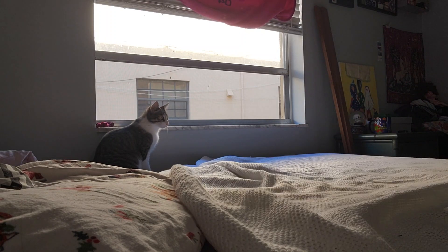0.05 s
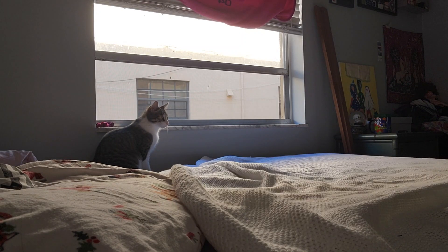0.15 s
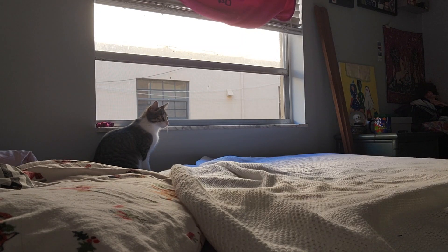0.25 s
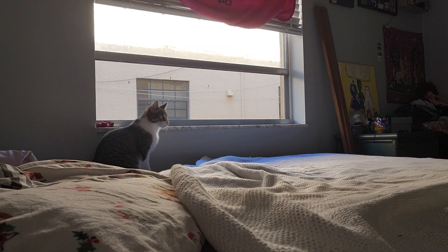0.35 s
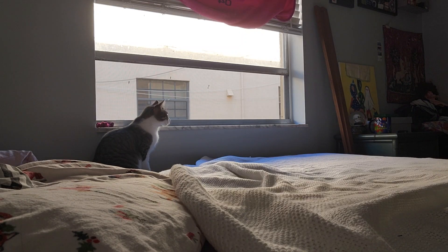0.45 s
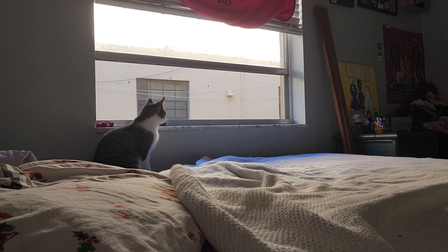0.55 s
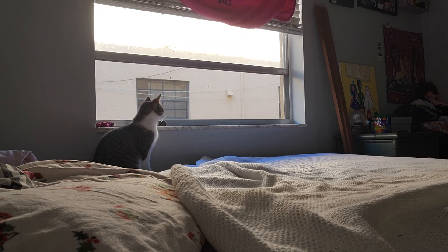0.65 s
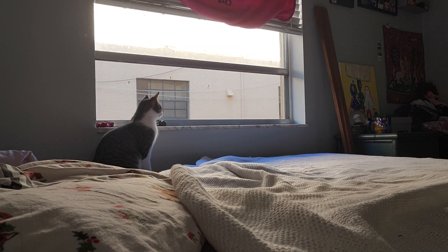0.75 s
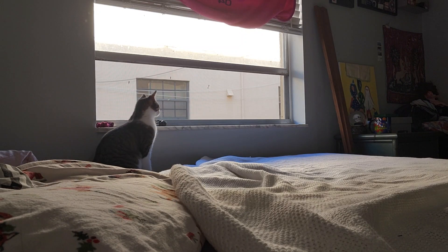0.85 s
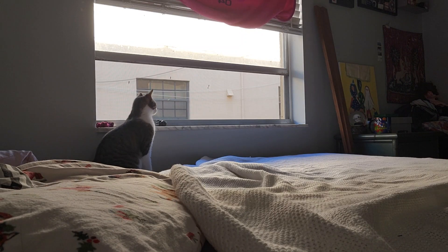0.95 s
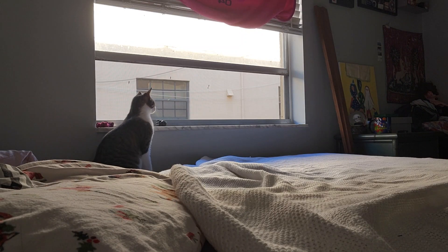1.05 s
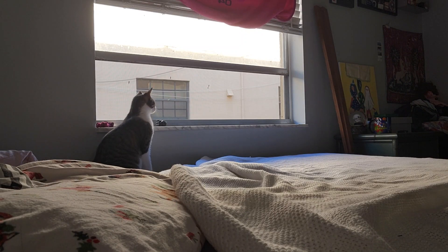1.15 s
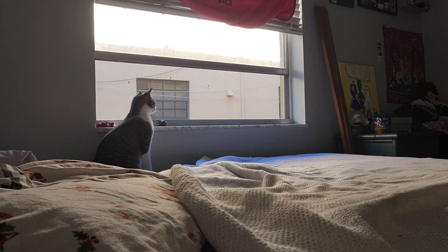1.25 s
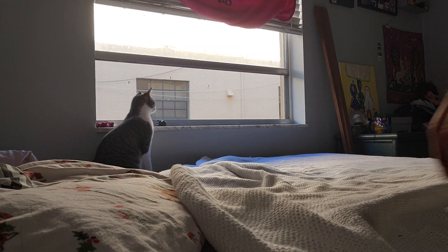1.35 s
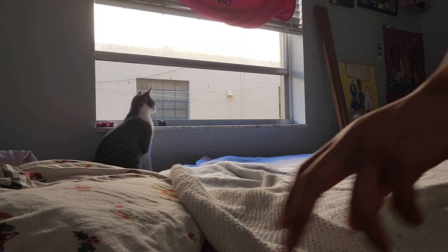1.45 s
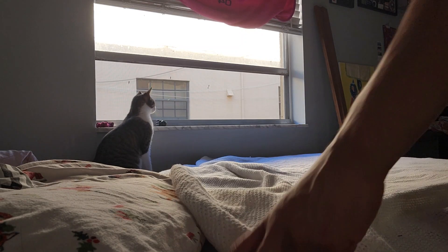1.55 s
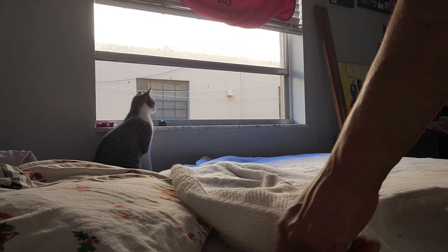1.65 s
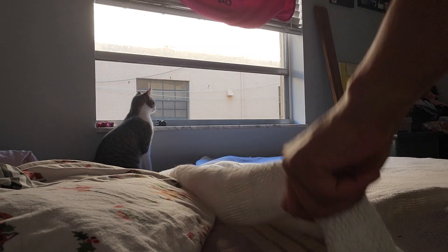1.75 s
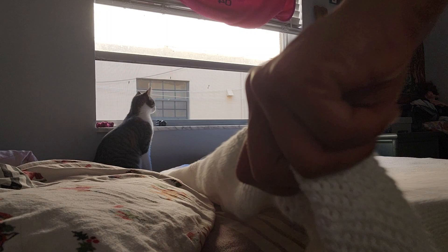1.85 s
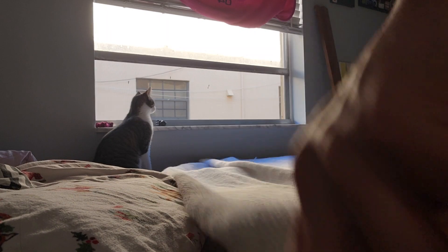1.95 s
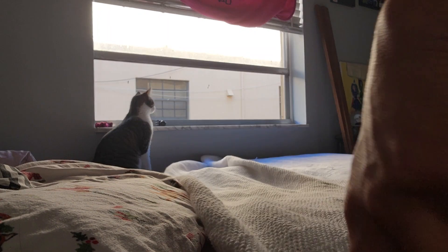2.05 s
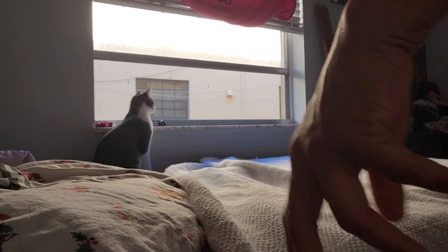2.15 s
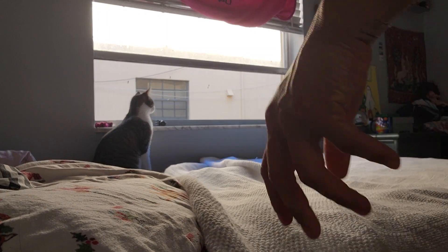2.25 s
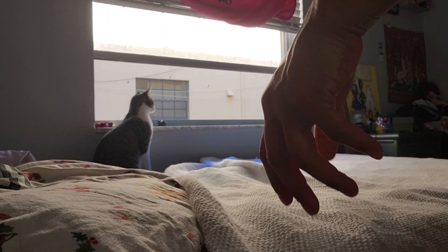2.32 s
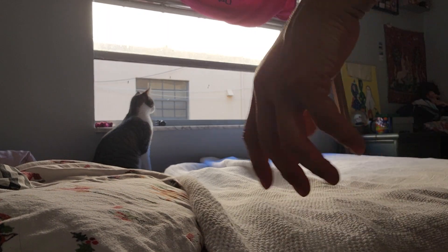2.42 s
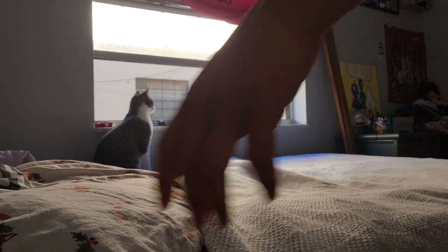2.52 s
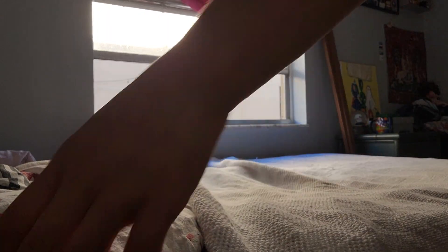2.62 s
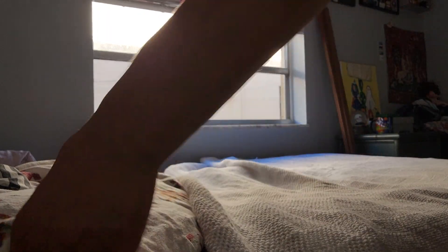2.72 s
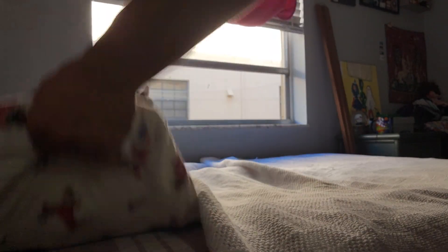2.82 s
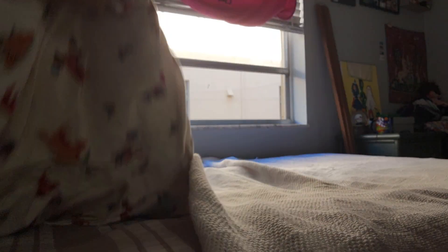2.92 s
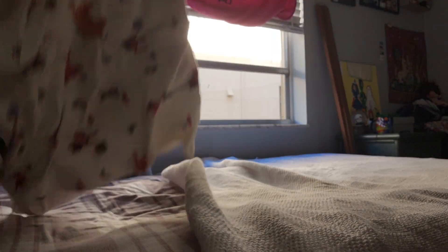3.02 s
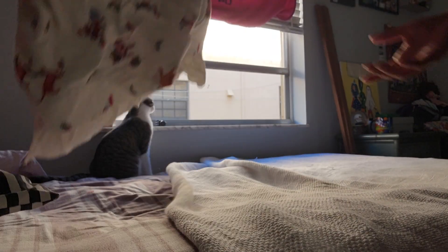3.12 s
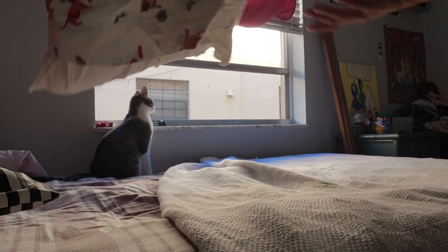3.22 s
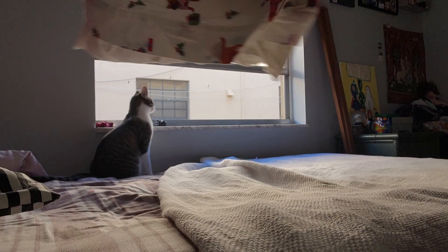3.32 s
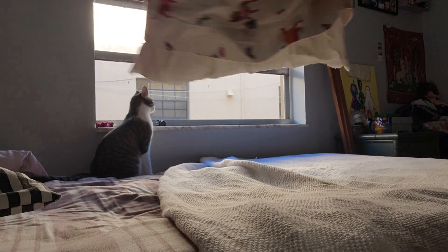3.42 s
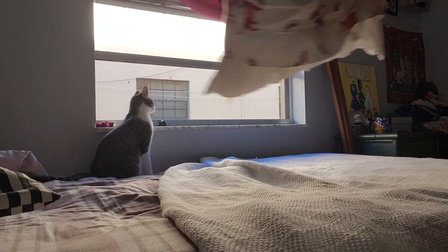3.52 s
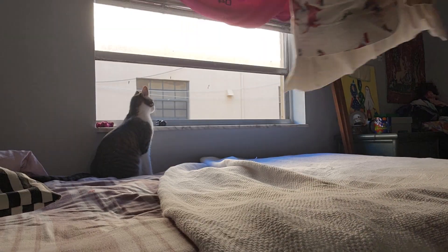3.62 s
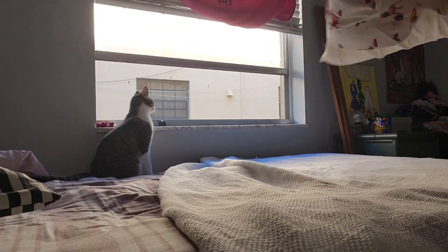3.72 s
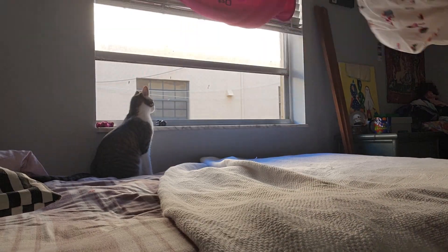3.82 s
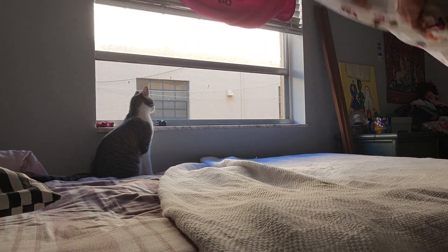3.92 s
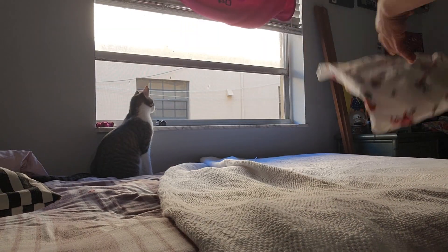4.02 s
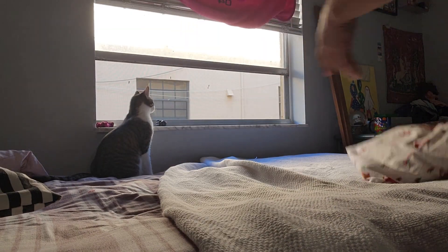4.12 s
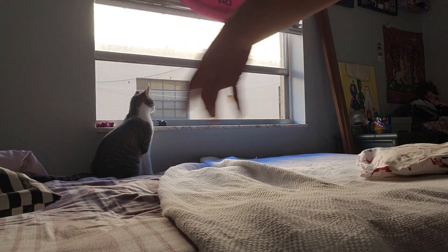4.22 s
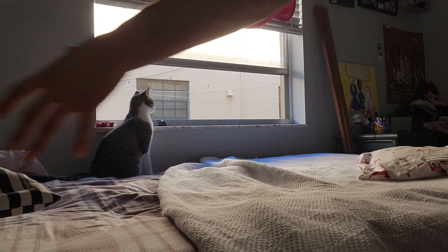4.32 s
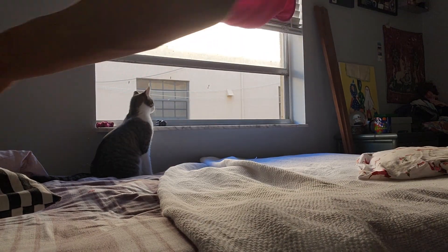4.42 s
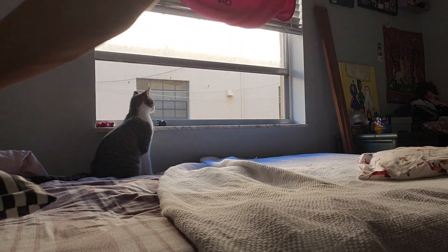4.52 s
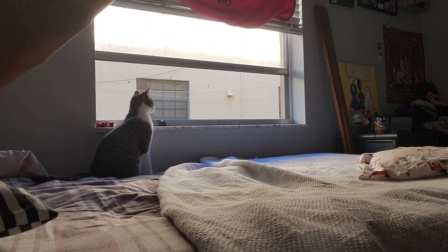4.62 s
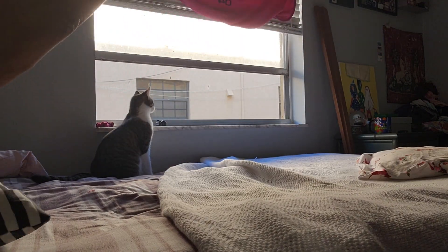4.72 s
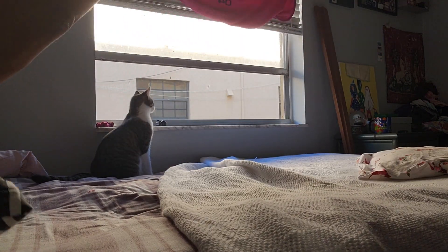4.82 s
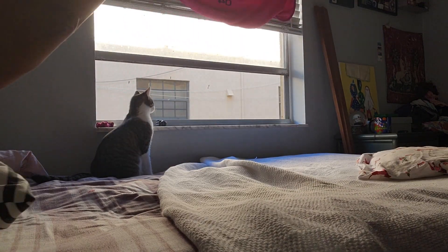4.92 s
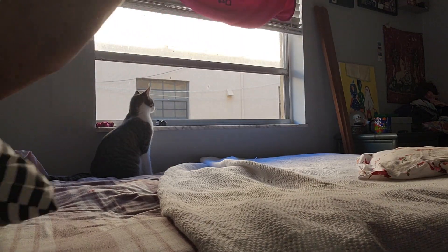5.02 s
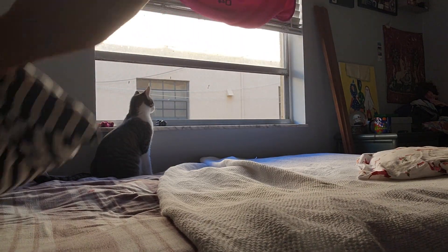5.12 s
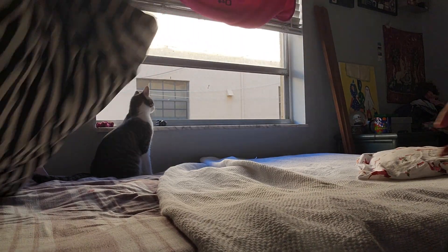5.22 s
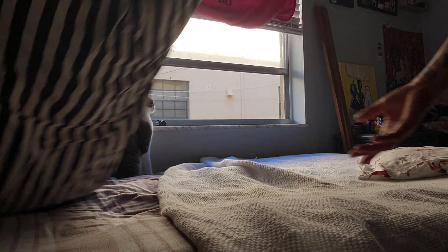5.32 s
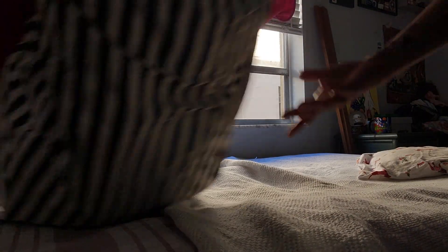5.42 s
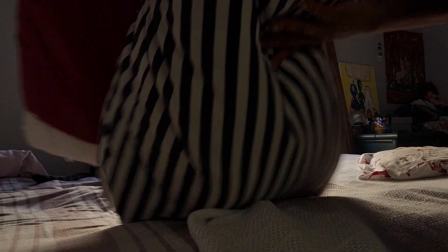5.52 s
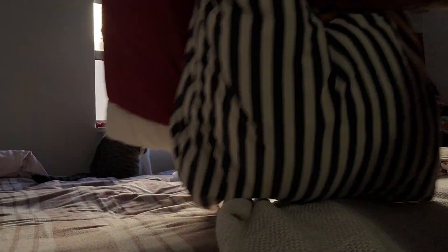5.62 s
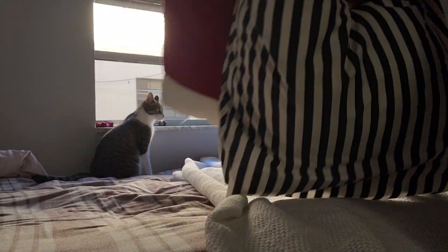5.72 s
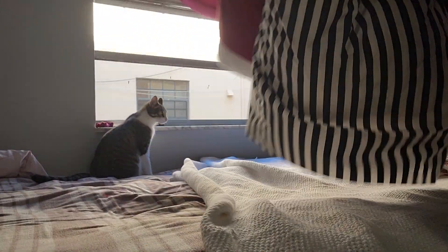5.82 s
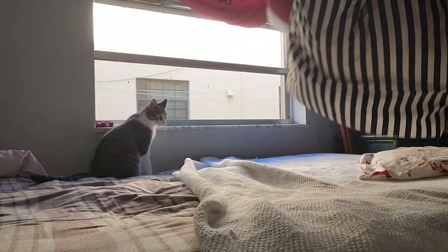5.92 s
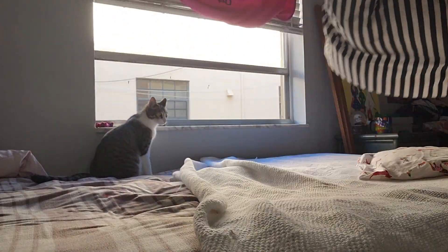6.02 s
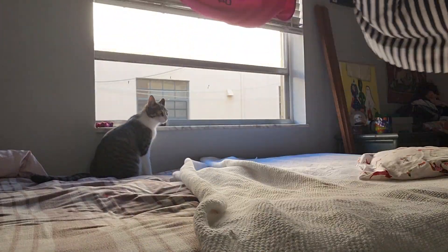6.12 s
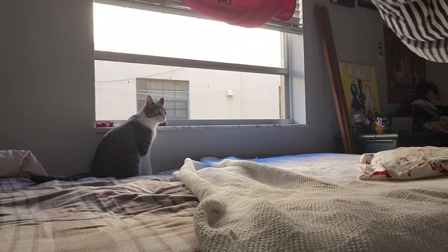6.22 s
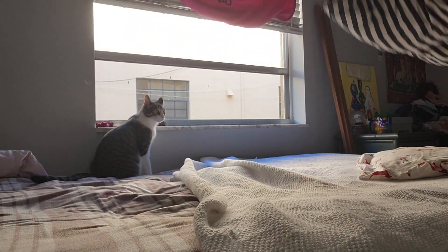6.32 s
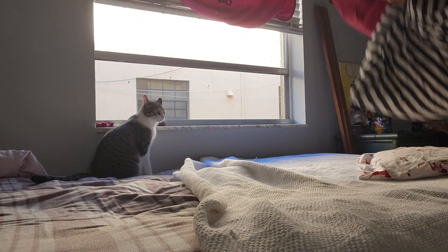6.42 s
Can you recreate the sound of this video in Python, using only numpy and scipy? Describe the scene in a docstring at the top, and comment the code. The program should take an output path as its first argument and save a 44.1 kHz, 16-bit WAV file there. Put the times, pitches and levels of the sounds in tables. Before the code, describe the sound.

Close stereo microphones pick up bedding handled in a quiet, softly furnished bedroom, over faint air and low, wandering house rumble. A small rustle comes at 0.1 s, then a quick crumple and snap at 0.7. Bright, fine swishes of cloth sliding on cloth, leaning right, come at 1.0-1.2 and 1.4-1.6, with a small fold snap at 1.55. A duller crumpling tug follows at 1.8, then light rubbing. From 2.5 to 3.1 muffled thumps cluster, strongest with snaps around 2.77, and folds crumple loudly near 2.95. A softer long slide trails to 3.4, with a light bump and rustle at 3.5. It is quieter until soft pats at 4.4. Swishes and low mattress heaves drift left from 4.8 to 5.5, with a crisp snap at 5.25. The loudest, a short firm thud with a snap, lands at 5.69. Cloth settles faintly until about 6.4.

```python
"""Making a bed, close to the microphones

In a quiet bedroom cloth slides over cloth with a bright swish: grainy noise under stroke envelopes, band by band.
Folds crumple (uneven noise ringing air pockets) and snap taut (short noise puffs). Hands and pillows land on the
mattress as thumps that ring its modes, and it heaves in low noise. The soft room answers thumps and snaps with
a short wash, over a low rumble of house and bed frame and a faint room air, both of them noise."""
import sys
import numpy as np
from scipy import signal
from scipy.fft import rfft, irfft, next_fast_len
from scipy.io import wavfile

SR = 44100
rng = np.random.default_rng(int(sys.argv[2]) if len(sys.argv) > 2 else 0)


def log_audio(samples):
    """Write samples as a 16-bit WAV file to the path given in sys.argv[1]."""
    # one column per channel
    frames = np.atleast_2d(samples).T
    # limit to full scale, then quantise
    limited = np.clip(frames, -1, 1)
    pcm = np.round(limited * 32767).astype(np.int16)
    wavfile.write(sys.argv[1], SR, pcm)


N = 284886


def from_db(db):
    """Decibels to gain."""
    return 10 ** (np.asarray(db) / 20)


def rms_one(x):
    """Scale to rms 1."""
    return x / np.sqrt(np.mean(x ** 2) + 1e-20)


def in_time(rows):
    """Read a table of (time, value) at every sample."""
    s, value = np.transpose(rows)
    return np.interp(np.arange(N) / SR, s, value)


def at_hz(points, hz):
    """Read a table of (frequency, value) on a log-frequency axis."""
    table_hz, value = np.transpose(points)
    return np.interp(np.log(hz), np.log(table_hz), value)


def band(x, low, high):
    """Band-pass between two frequencies in Hz."""
    return signal.sosfilt(signal.butter(2, [low, high], "band", fs=SR, output="sos"), x)


def drift(rate_hz):
    """Slow chance of rms 1: noise at every 8th sample through a double one-pole low-pass."""
    r = np.exp(-2 * np.pi * rate_hz * 8 / SR)
    noise = rng.standard_normal(N // 8 + 4002)
    slow = signal.lfilter([1], [1, -2 * r, r * r], noise)[4000:]   # drop the filter's start
    return np.interp(np.arange(N) / 8, np.arange(len(slow)), rms_one(slow))


def fibres(spectrum, grain_db, grain_hz, lag_ms):
    """Noise clumped into grains and coloured, rms 1; its shared part reaches the left side lag_ms later."""
    # how alike the two microphones hear: f/Hz, shared part of the power
    likeness = [(60, .98), (180, 0.89), (550, 0.67), (1650, 0.12), (5000, 0.17), (15000, 0.1)]
    size = next_fast_len(N)
    grains = rng.standard_normal((3, N)) * from_db(grain_db * drift(grain_hz))
    shared, *own = rfft(grains, size)
    hz = np.linspace(1, SR / 2, len(shared))
    alike = at_hz(likeness, hz)
    late = np.exp(-1j * np.pi * hz * lag_ms / 1000 * np.array([[1], [-1]]))   # half the lag on each side
    pair = np.sqrt(alike) * shared * late + np.sqrt(1 - alike) * np.array(own)
    return rms_one(irfft(pair * from_db(at_hz(spectrum, hz)), size)[:, :N])


def gestures(rows):
    """Rise, hold and fall in dB under full level, and seconds since full level; a row per gesture."""
    swell_db = 20   # gained in the rise time, lost in the fall time
    s, rise, hold, fall = np.array(rows)[:, :4].T[:, :, None] + 1e-4
    since = np.arange(0, N + 32, 32) / SR - s   # every 32nd sample
    rising, falling = -since / rise, (since - hold) / fall
    return -swell_db * np.maximum(np.maximum(rising, falling), 0), since


def summed(power):
    """Power of all gestures together, at every sample."""
    return np.interp(np.arange(N) / 32, np.arange(power.shape[1]), power.sum(axis=0) + 1e-30)


def room_air():
    """The still room: faint steady-coloured noise, slowly uneven in level."""
    # colour of the air: f/Hz, relative level per Hz/dB
    air_colour = [(53, -31), (90, -1.5), (322, -14.5), (1010, -21), (1210, -25), (2800, -29.5), (5480, -30),
                  (10000, -40.5), (11700, -47), (14800, -34), (15800, -33.5)]
    return from_db(-63) * fibres(air_colour, grain_db=4.0, grain_hz=5.25, lag_ms=0.19)


def house_rumble():
    """House and bed frame: low noise whose level wanders."""
    # rumble level: t/s, level/dB
    rumble_level = [(0.0, -56), (0.54, -60.5), (1.19, -65), (1.39, -57), (2.53, -55), (2.7, -60),
                    (3.0, -46), (3.27, -58.5), (4.03, -57), (4.5, -58.5), (4.66, -60.5), (5.18, -56),
                    (5.36, -59), (6.19, -58), (6.46, -56.5)]
    # colour of the rumble: f/Hz, relative level per Hz/dB
    rumble_colour = [(14, -63), (26, -13), (42, 2.5), (58, 11.5), (75, -2.5), (100, 3.5), (140, -38)]
    noise = fibres(rumble_colour, grain_db=2.5, grain_hz=3.0, lag_ms=0.066)
    return from_db(in_time(rumble_level)) * noise


def bunch_levels():
    """Gains of crumple and heave, which follow the same gestures."""
    # cloth bunched and weight shifted: full level at t/s, rise/s, hold/s, fall/s,
    # crumple level/dB, mattress heave level/dB
    bunches = [ (0.111, 0.03, .003, 0.17, -58, -55), (0.545, 0.34, 0.077, .1, -78, -69.5),
               (.678, .048, .03, .05, -66, -78), (0.719, 0.011, .003, 0.074, -44, -52),
               (1.19, 0.29, .004, 0.054, -66, -68.5), (1.435, .07, .004, 0.1, -64, -62),
               (1.572, .09, .004, .16, -51.5, -55), (1.83, 0.047, 0.0043, 0.05, -40.5, -53),
               (2.195, 0.36, .005, .06, -61.5, -61.5), (2.3, .12, 0.28, .12, -71.5, -70.5),
               (2.739, 0.089, .03, .08, -49.5, -58.5), (2.788, 0.088, .003, 0.052, -45.5, -55),
               (2.847, .06, .003, .031, -40.5, -66), (2.95, 0.036, .003, 0.059, -34.5, -47),
               (3.035, .1, 0.14, 0.4, -54, -53.5), (3.524, .015, .004, 0.074, -48, -57),
               (3.562, 0.21, .004, 0.47, -54, -57), (4.066, 0.053, .004, 0.39, -67, -64),
               (4.409, 0.081, .004, .13, -54, -49), (4.575, 0.086, .004, 0.2, -76, -67),
               (4.849, 0.18, .004, 0.12, -61.5, -53.5), (5.108, 0.16, .004, 0.24, -49.5, -48.5),
               (5.357, .21, 0.34, .1, -62.5, -56), (5.72, 0.12, .004, 0.22, -53.5, -53),
               (5.898, 0.14, 0.2, .1, -70.5, -64), (6.127, .12, .003, 0.058, -62.5, -60.5),
               (6.2, 0.04, .004, .15, -68, -60), (6.33, .21, 0.14, .1, -70, -68.5), ]
    shape_db = gestures(bunches)[0]
    crumple_db, heave_db = np.array(bunches)[:, 4:].T[:, :, None]
    return [np.sqrt(summed(from_db(db + shape_db) ** 2)) for db in (crumple_db, heave_db)]


def mattress_heave(weight):
    """Shifting weight works the mattress: low, uneven noise that follows the gestures."""
    # colour of the heave: f/Hz, relative level per Hz/dB
    heave_colour = [(50, -55), (100, 0), (200, -4.5), (400, -10.5), (800, -30)]
    return weight * fibres(heave_colour, grain_db=2.5, grain_hz=32, lag_ms=0.13)


def thumps():
    """A push as long as the contact rings the bed's modes; long soft contacts reach only the low ones."""
    # hands and pillows landing: t/s, peak level before the side gains/dB, contact/ms
    landings = [(1.778, -43, 6.2), (2.533, -30.5, 10.5), (2.645, -39.5, 8.6), (2.764, -23.5, 2.06),
                (2.777, -29, 1.42), (2.827, -28.5, 0.67), (2.968, -35.5, 8.5), (3.113, -36, 12),
                (3.522, -40.5, 5.9), (4.362, -42.5, 15.4), (4.411, -36.5, 7.6), (5.684, -20, 2.3),
                (5.69, -14.5, 1.2), (5.751, -35, 5.4)]
    # modes of mattress and frame: f/Hz, relative level/dB (chance is added), t60/s
    modes = [(40.5, -31, 0.13), (78.9, -8, 0.43), (169, 1.5, 0.076), (221, 0.5, 0.047), (319, 1, 0.037),
             (443, 1.5, 0.021), (516, -9, 0.023), (946, -3.5, 0.043), (1440, -23, 0.036)]
    out, t = np.zeros(N + SR), np.arange(SR // 2) / SR
    scatter_db = rng.normal(0, 1.5, (len(landings), len(modes)))   # each landing excites the modes differently
    for (s, peak_db, contact_ms), chance in zip(landings, scatter_db):
        rings = np.zeros(len(t))
        for (hz, db, t60), extra_db in zip(modes, chance):
            rings += from_db(db + extra_db - 60 * t / t60) * np.sin(2 * np.pi * hz * t)
        push = np.hanning(3 + contact_ms * SR / 1000)
        blow = signal.fftconvolve(rings, push)[:len(t)]
        # a short contact moves a small patch, which sends out little bass
        blow = band(blow, 190 / contact_ms, 8000)
        out[round(s * SR):][:len(t)] += from_db(peak_db) * blow / np.abs(blow).max()
    return out[:N] * from_db([[.8], [-.8]])   # a little to the left


def snaps():
    """Seams and folds pulled taut: a sharp puff of noise around its centre, dying fast."""
    # snaps: t/s, peak level before the lean/dB, centre f/Hz, t60 before the band-pass/s, left over right/dB
    snap_rows = [(.104, -52, 2700, 0.021, -10), (0.712, -41.5, 1450, 0.013, -4),
                 (1.562, -36.5, 1270, 0.012, -11), (2.681, -55, 900, 0.013, -8),
                 (2.745, -35.5, 785, 0.024, -11), (2.763, -28, 1290, 0.033, 1), (2.825, -39, 700, 0.05, -3),
                 (2.915, -68, 1000, 0.026, 1), (2.945, -41, 1160, 0.069, 9), (3.523, -43, 1440, 0.028, 6),
                 (5.107, -47, 2450, 0.027, 10), (4.781, -53.5, 2500, 0.028, 10),
                 (5.04, -47.5, 4000, 0.029, 11), (5.256, -37, 2650, 0.019, 3), (5.68, -42, 1300, 0.051, 9),
                 (5.688, -26, 1040, 0.031, 1), (6.328, -57, 5000, 0.035, -10)]
    out, t = np.zeros((2, N + SR)), np.arange(SR // 5) / SR
    noises = rng.standard_normal((len(snap_rows), 3, len(t)))
    for (s, peak_db, hz, t60, pan_db), noise in zip(snap_rows, noises):
        sides = noise[0] + .5 * noise[1:]   # mostly shared by both sides
        puff = band(sides * from_db(-60 * t / t60), hz / 3, hz * 2.5)
        gains = from_db(peak_db + pan_db / 2 * np.array([[1], [-1]]))
        out[:, round(s * SR):][:, :len(t)] += gains * puff / np.abs(puff).max()
    return out[:, :N]


def bedroom(x):
    """Soft walls return a short, dull, decaying wash, partly shared by both sides."""
    t60_s, level_db, first_echo_s = 0.3, -22.5, .006
    t = np.arange(SR // 2) / SR
    echoes = rng.standard_normal((3, len(t)))
    wash = band(echoes[0] + 0.63 * echoes[1:], 155, 3100)
    tail = wash * from_db(-60 * t / t60_s) * (t > first_echo_s)
    tail = tail / np.sqrt(np.sum(tail ** 2) / 2)   # unit energy, mean of the sides
    return from_db(level_db) * signal.fftconvolve(x, tail, axes=1)[:, :N]


def folds(crumple, taut):
    """Creases buckle in uneven grains; they and the snaps ring the air pockets between the folds."""
    # colour of the creases: f/Hz, relative level per Hz/dB
    crease_colour = [(150, -23), (300, -4.5), (2000, 2), (5000, 4), (10000, -38)]
    # air held in the folds: f/Hz, width/Hz, level before drift and side gains/dB
    pockets = [(340, 111, 5.5), (549, 122, 8.5), (746, 158, 4), (976, 160, 3), (1496, 265, -2),
               (2030, 490, -10), (2630, 490, -41)]
    creases = crumple * fibres(crease_colour, grain_db=2.5, grain_hz=32, lag_ms=-0.17)
    drive, out = creases + from_db(-11) * taut, 0
    for k, (hz, width, db) in enumerate(pockets):
        r = np.exp(-np.pi * width / SR)
        resonance = [1, -2 * r * np.cos(2 * np.pi * hz / SR), r * r]
        ring = signal.lfilter([1 - r * r, 0, r * r - 1], resonance, drive)
        sign = (-1) ** k   # neighbouring pockets in opposite phase
        out = out + sign * from_db(db + 2.0 * drift(14.6)) * ring
    return out * from_db([[.6], [-.6]])


def stroke_levels():
    """Gain of the swish, and its fineness in dB, led by the loudest stroke."""
    # strokes of cloth over cloth: full level at t/s, rise/s, hold/s, fall/s,
    # swish level before fineness/dB, fineness at the start (extra treble)/dB
    strokes = [ (0.097, 0.013, .002, 0.14, -58, -0.5), (.345, 0.21, .005, 0.048, -62.5, 4.5),
               (0.548, .15, .005, 0.1, -64.5, 1.5), (0.694, 0.04, .005, 0.37, -65, -8),
               (.716, 0.0065, .002, 0.054, -40, -5.5), (0.996, .012, 0.034, .03, -61.5, 20.5),
               (1.041, 0.038, .12, 0.071, -44.5, 12), (1.359, 0.092, .05, .05, -58, 10.5),
               (1.434, 0.027, .14, 0.076, -45, 8.5), (1.83, .12, .005, .25, -47.5, -2),
               (2.188, 0.041, .005, 0.07, -60.5, -2), (2.322, 0.1, .15, 0.076, -54.5, -1.5),
               (2.723, 0.04, 0.047, 0.073, -50.5, -4.5), (2.837, 0.054, .003, 0.044, -54.5, -21),
               (2.96, .016, 0.32, 0.19, -53.5, -10.5), (3.55, 0.23, .27, 0.076, -58.5, -4),
               (4.097, 0.31, 0.077, .11, -63.5, -3), (4.398, 0.05, 0.034, .1, -61, -14),
               (4.799, 0.05, 0.046, 0.33, -57.5, -3), (5.028, .22, 0.065, 0.51, -59, -2),
               (5.11, 0.025, .003, .055, -54, -21), (5.256, .012, .018, .04, -56.5, -6),
               (5.44, 0.2, .005, 0.22, -52.5, -1), (5.71, 0.23, .1, .17, -59.5, -2),
               (6.12, 0.29, .005, .05, -70.5, -15), (6.324, 0.069, .14, .1, -70.5, 1), ]
    # after full level, a stroke's fineness settles toward this, from above or below
    settled_db, settle_s = -4.5, 0.096
    shape_db, since = gestures(strokes)
    level_db, start_db = np.array(strokes)[:, 4:].T[:, :, None]
    power = from_db(level_db + shape_db) ** 2
    fine_db = settled_db + (start_db - settled_db) * np.exp(-np.maximum(since, 0) / settle_s)
    return np.sqrt(summed(power)), summed(power * fine_db) / summed(power)


def swish():
    """Threads catching on threads; overlapping bands waver a little, and fineness tilts the hiss."""
    # colour of the swish: f/Hz, relative level per Hz/dB
    swish_colour = [(900, -63), (1500, -20.5), (2200, -11.5), (3400, -7.5), (4800, 0.5), (6400, -5.5),
                    (7600, -2), (9800, -13), (11800, -5.5), (15800, -11.5)]
    # where the cloth slides: t/s, left over right/dB (scaled by the shadow)
    lean = [(0, -5), (.8, -4.5), (1.0, -7.5), (1.7, -5.5), (2.3, -4.5), (3.2, -0.5), (5.0, 3), (6.46, -2)]
    # how strongly each pitch leans, treble most: f/Hz, share of the lean
    shadow = [(1500, .15), (4500, .45), (8000, .85), (15000, 1.35)]
    level, fine_db = stroke_levels()
    pan_db, out = in_time(lean), 0
    threads = rfft(fibres(swish_colour, grain_db=-1.0, grain_hz=120, lag_ms=0.333))
    octave = np.log2(np.linspace(1, SR / 2, threads.shape[1]) / 1000)   # above 1 kHz
    for centre in np.arange(0, 4.6, .5):
        triangle = np.clip(1 - 2 * np.abs(octave - centre), 0, 1)   # neighbours sum to one
        part = irfft(threads * triangle, N)
        hz = 1000 * 2 ** centre
        tilt = np.clip(np.log2(hz / 4500), -.6, 1)
        sides = from_db(pan_db * at_hz(shadow, hz) / 2 * [[1], [-1]])
        sides = sides / np.sqrt(np.mean(sides ** 2, axis=0))   # leaning keeps the total power
        out = out + part * sides * from_db(tilt * fine_db + 2.38 * drift(13.4))
    return level * out


def scene():
    """Room air and rumble, the heaving mattress, blows with their room, and cloth on top."""
    crumple, weight = bunch_levels()
    background = room_air() + house_rumble()
    taut = snaps()
    blows = thumps() + taut
    cloth = folds(crumple, taut) + swish()
    return background + mattress_heave(weight) + blows + bedroom(blows) + cloth


def record(dry):
    """The top is cut steeply above 15880 Hz."""
    return signal.sosfilt(signal.ellip(14, .5, 70, 15880, fs=SR, output="sos"), dry)


dry = scene()
out = record(dry)
log_audio(out)
```